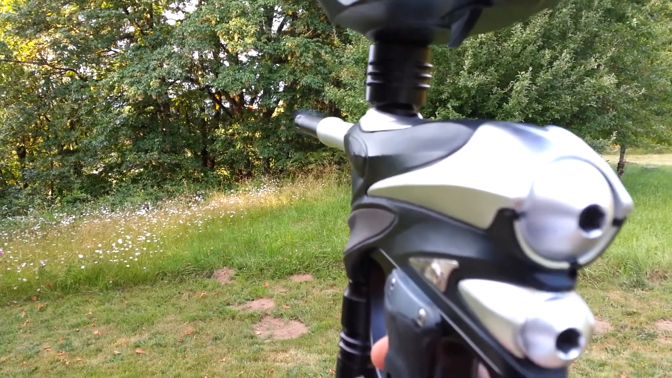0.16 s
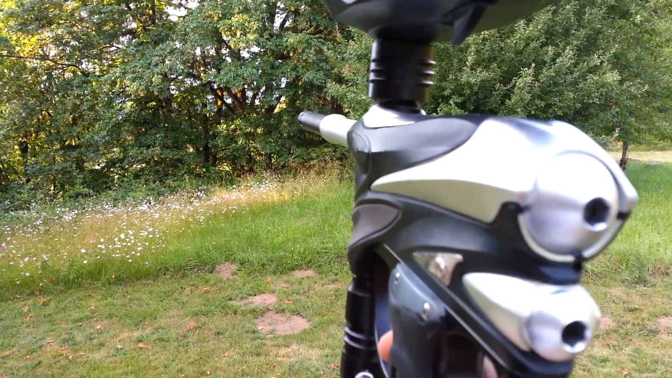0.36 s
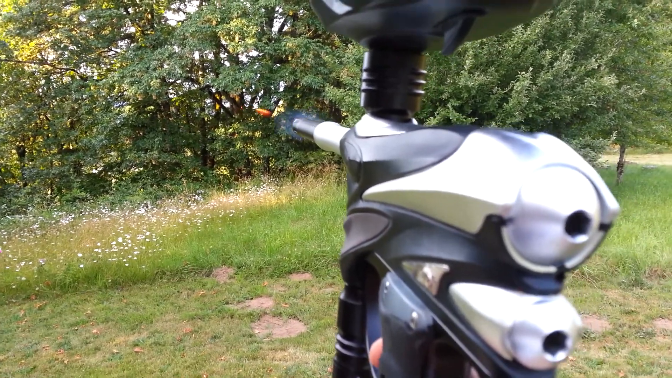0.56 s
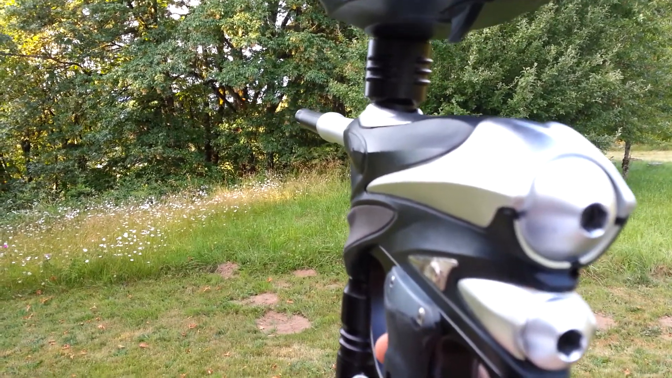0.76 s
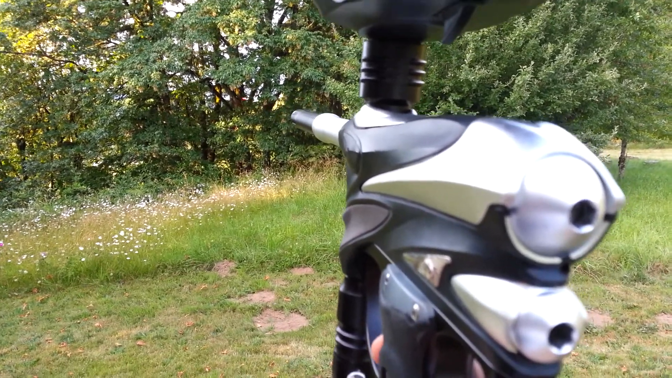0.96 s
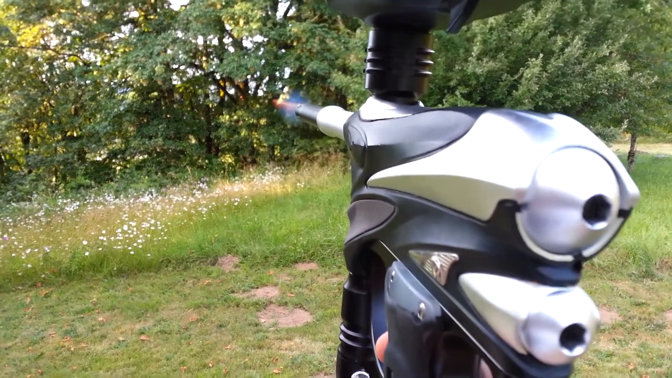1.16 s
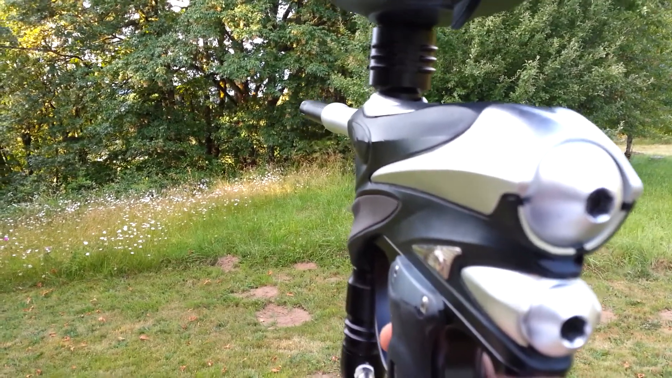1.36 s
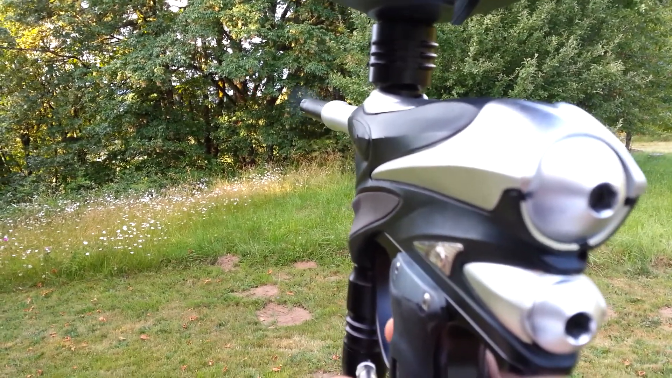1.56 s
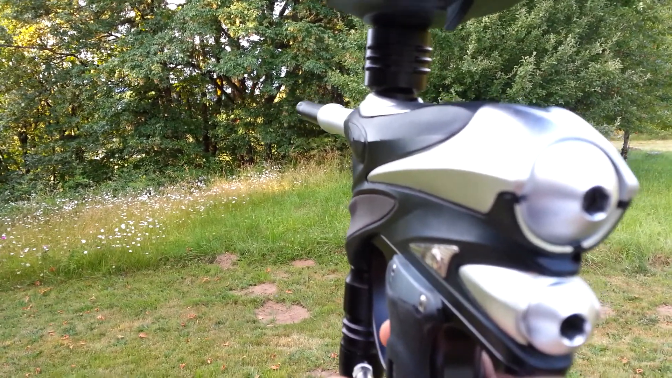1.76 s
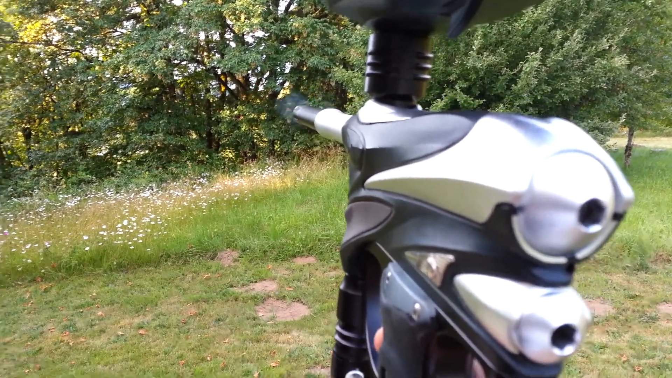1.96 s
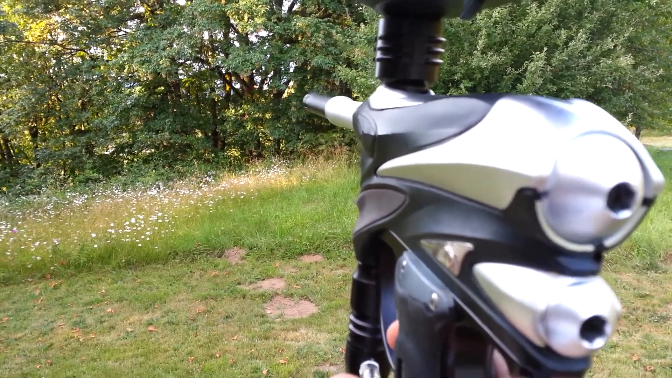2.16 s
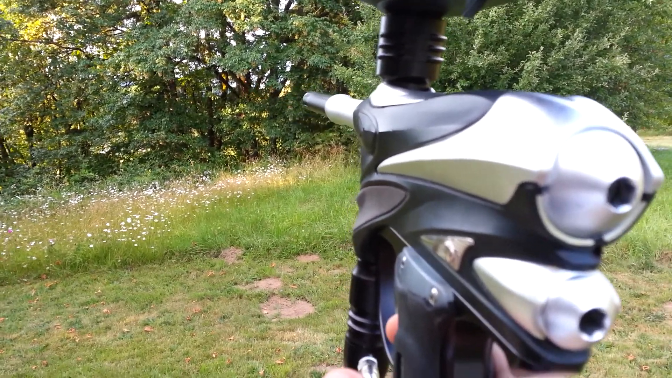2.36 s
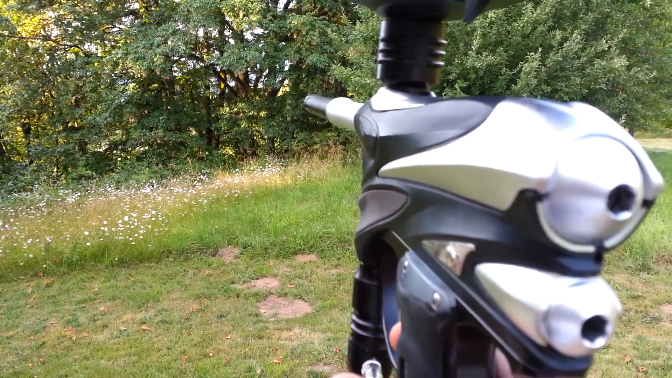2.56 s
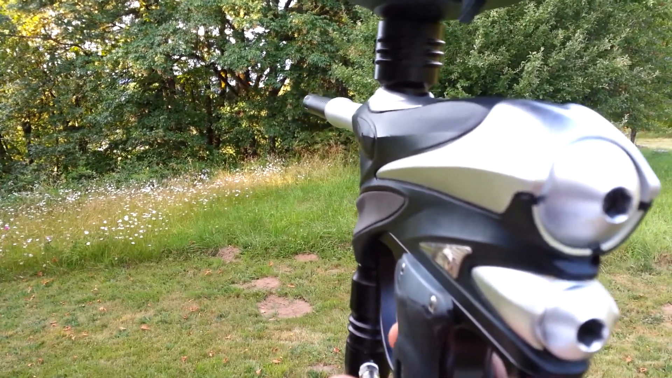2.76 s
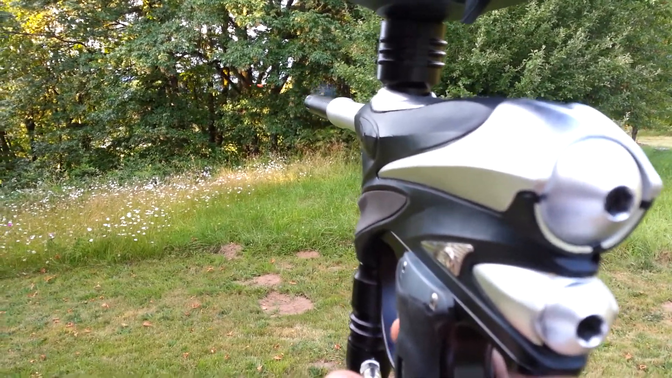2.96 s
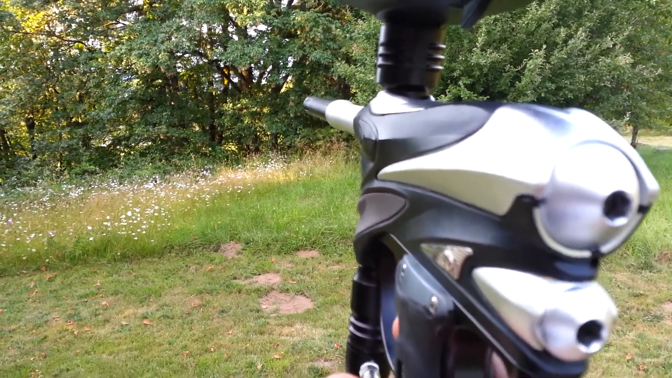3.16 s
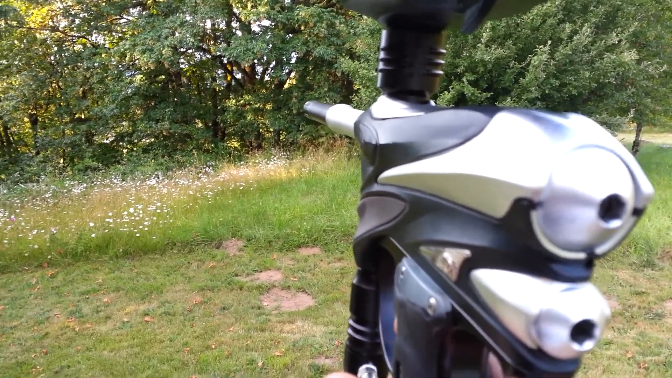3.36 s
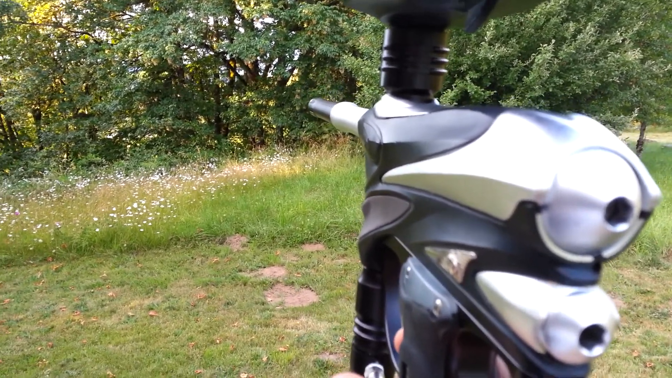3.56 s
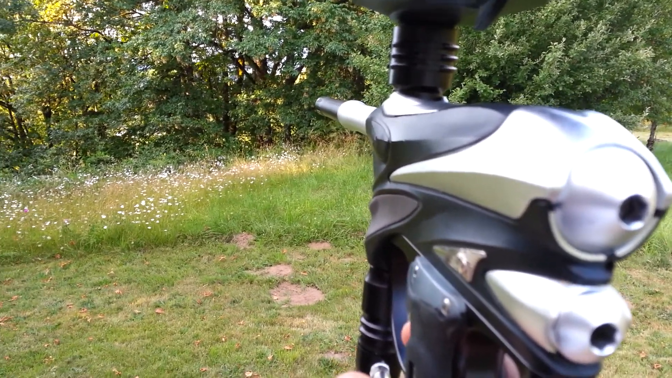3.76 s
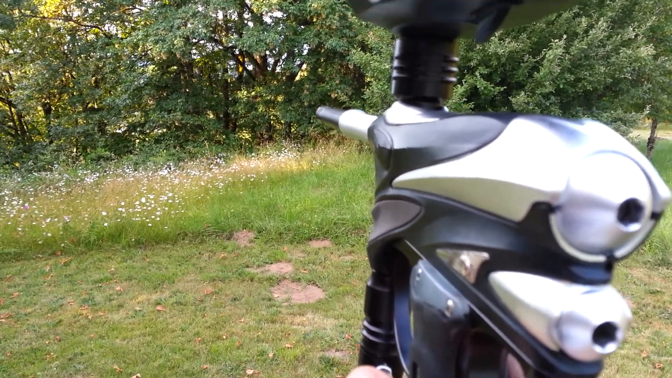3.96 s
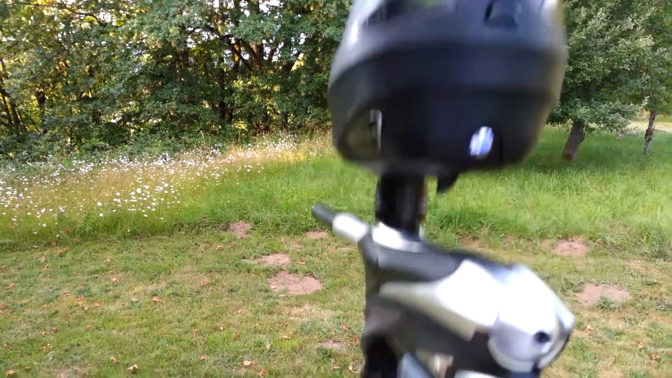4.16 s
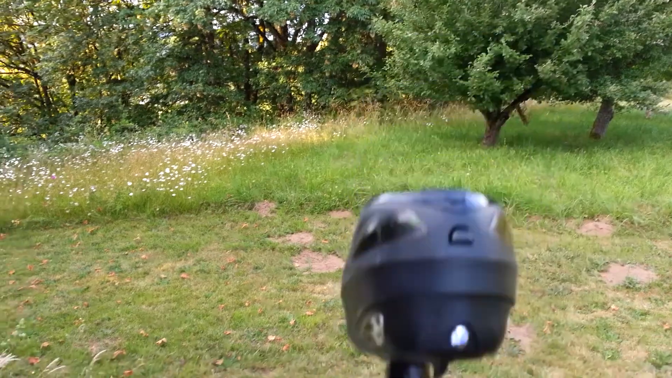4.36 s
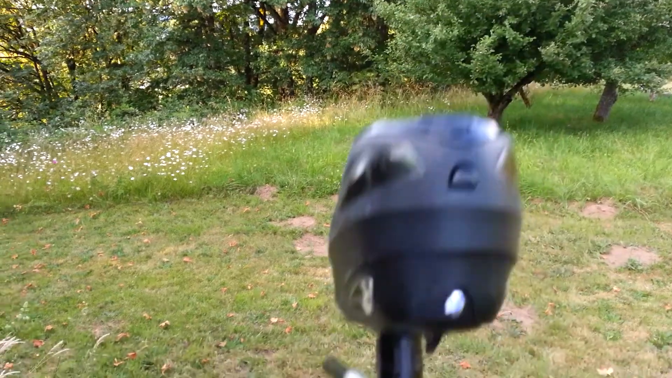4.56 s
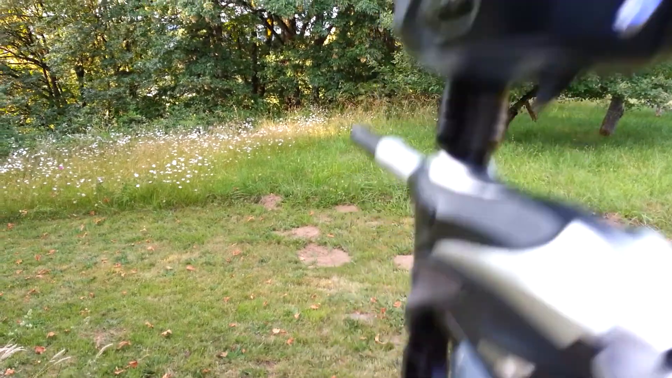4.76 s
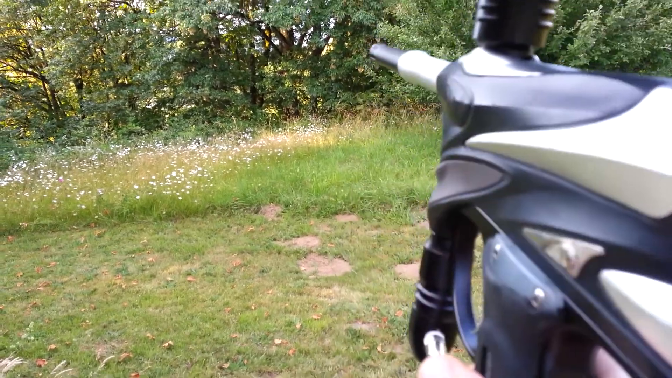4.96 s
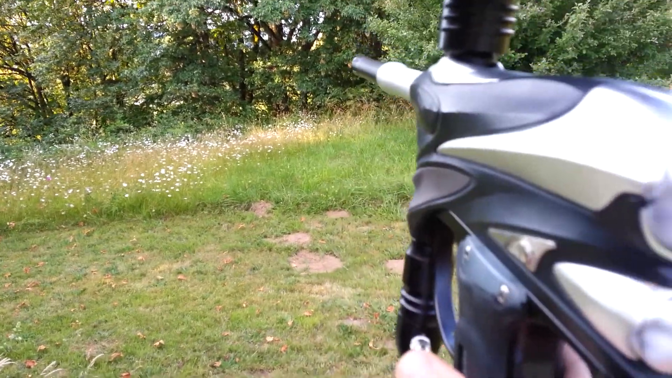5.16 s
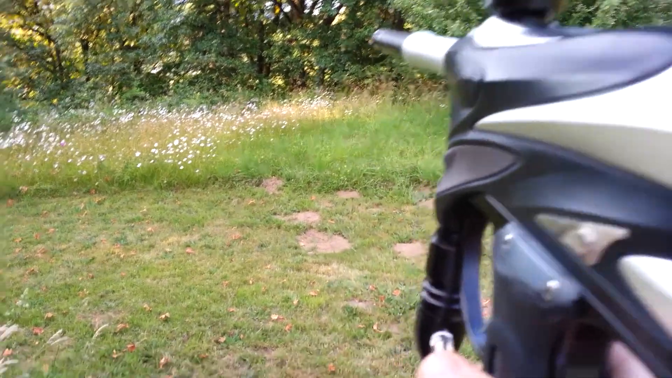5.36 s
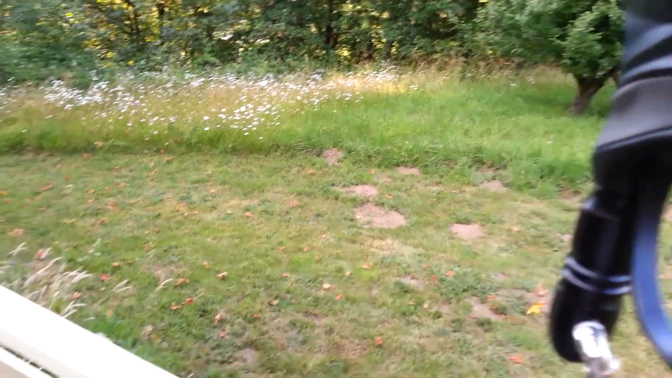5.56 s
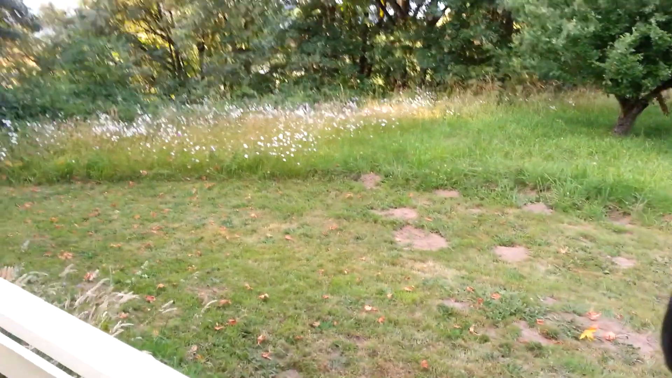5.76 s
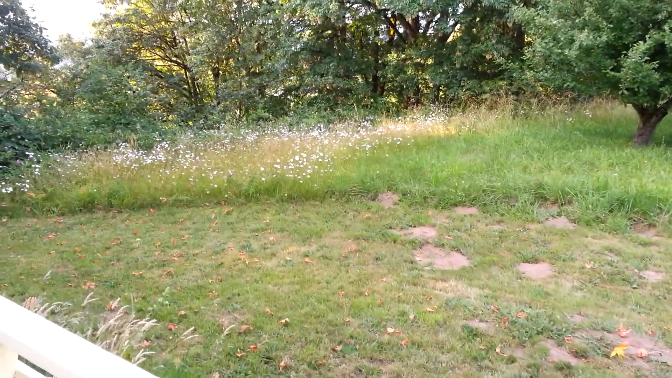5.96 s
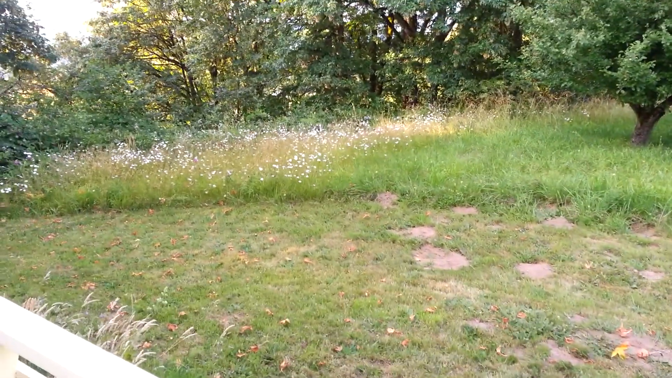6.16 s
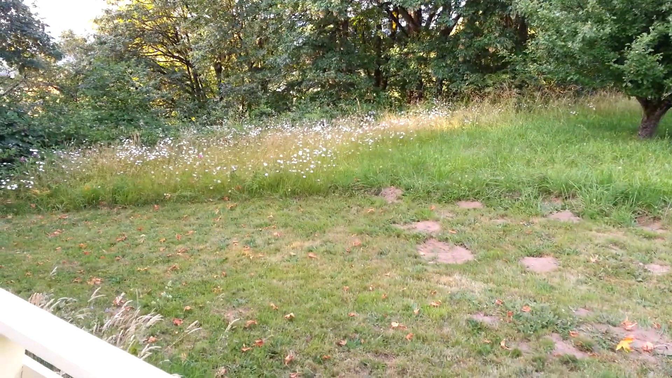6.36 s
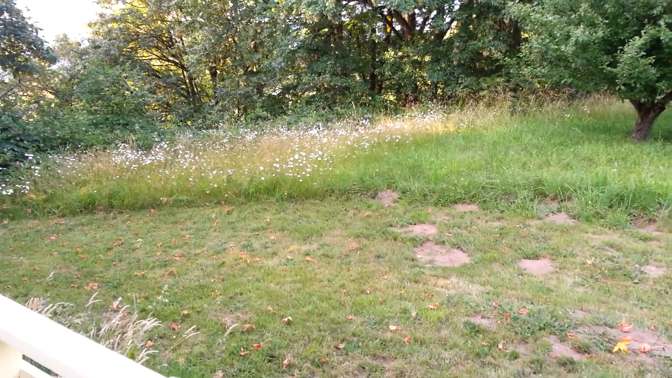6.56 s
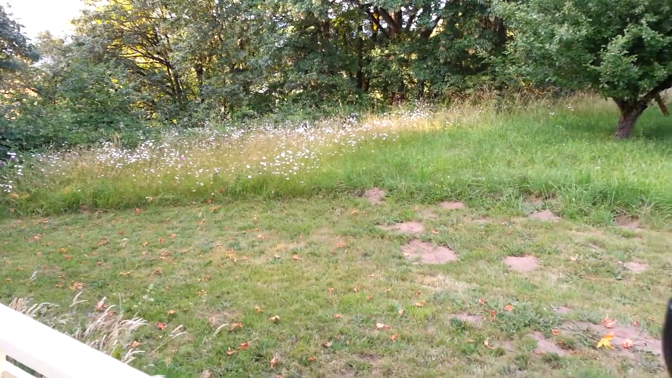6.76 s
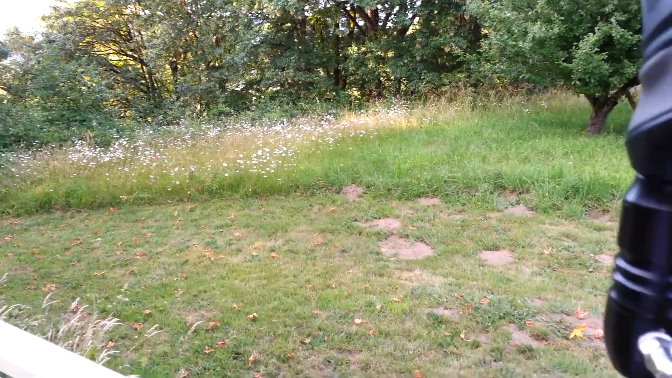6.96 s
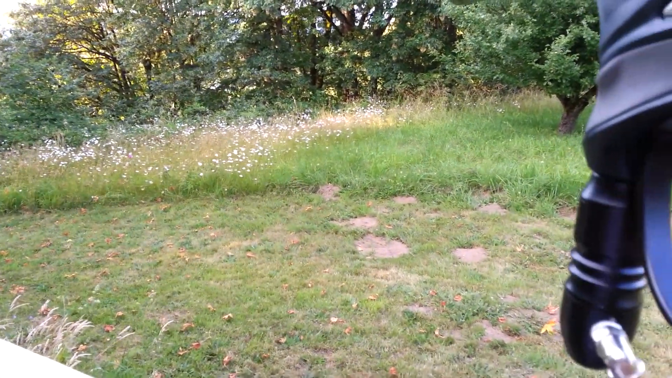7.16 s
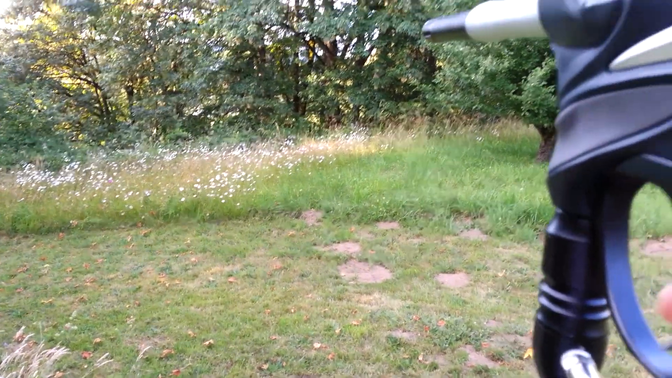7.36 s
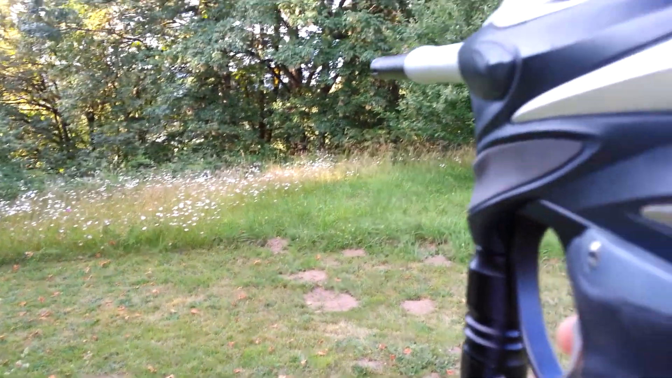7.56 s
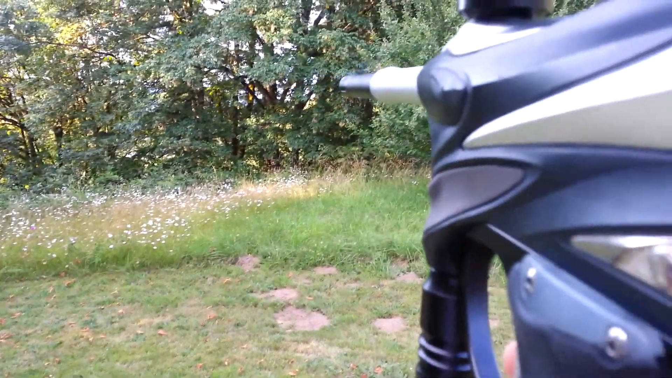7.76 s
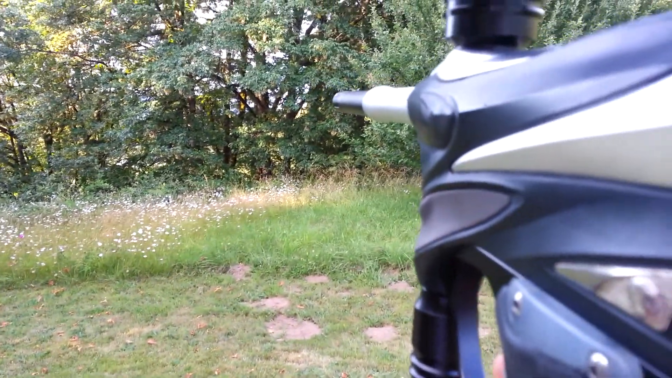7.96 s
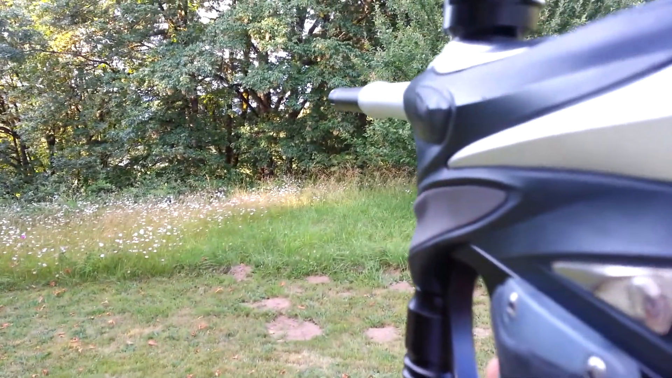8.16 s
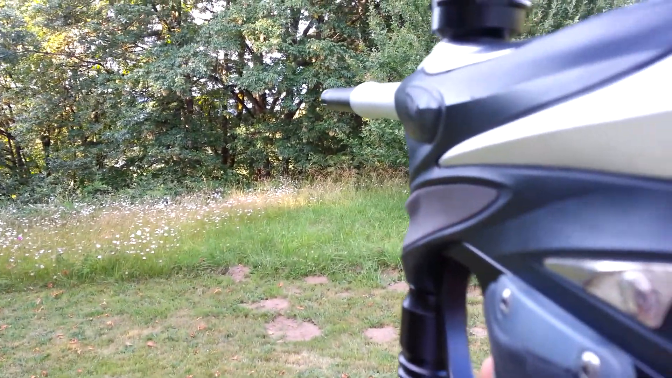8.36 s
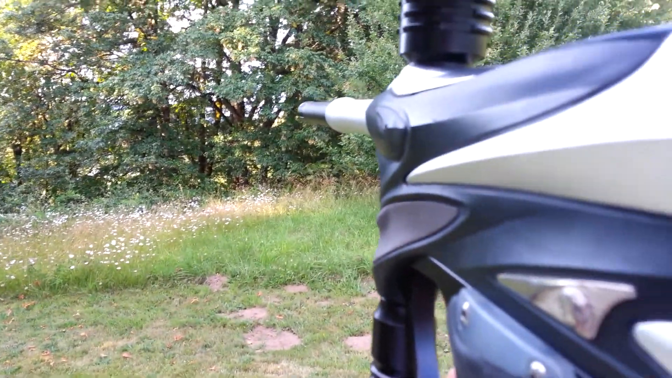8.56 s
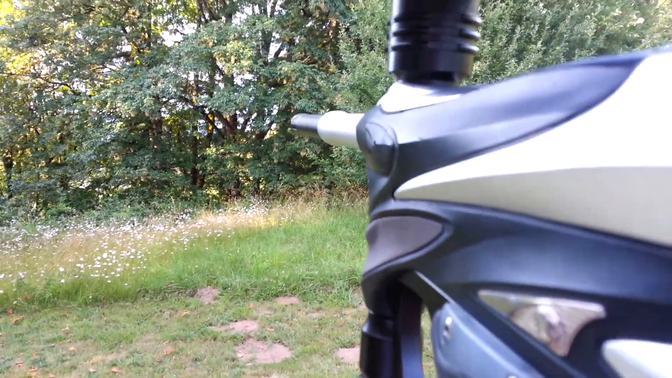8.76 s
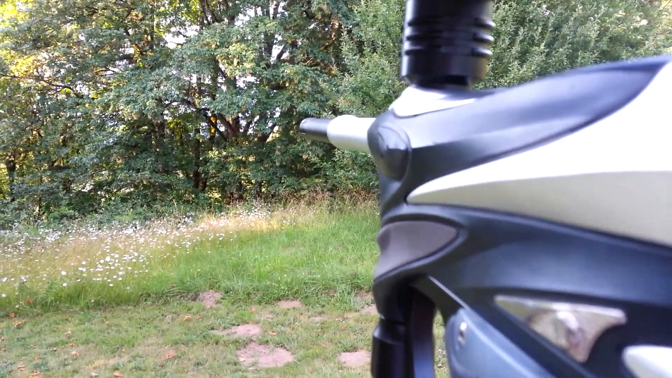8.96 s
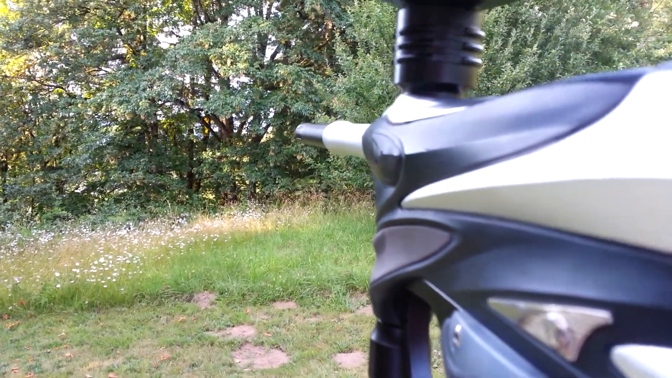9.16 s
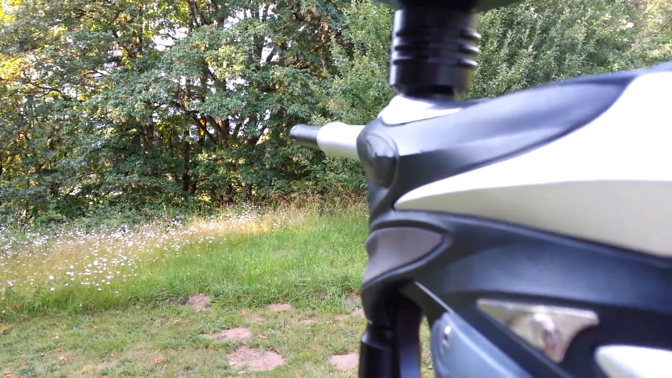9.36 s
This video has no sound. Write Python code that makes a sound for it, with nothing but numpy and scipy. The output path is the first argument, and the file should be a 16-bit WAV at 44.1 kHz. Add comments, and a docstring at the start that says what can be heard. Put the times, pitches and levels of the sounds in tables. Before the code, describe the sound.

Very close and overloaded, a paintball marker fires even streams of about twelve shots a second, then quick single shots, each a hard metallic clack with a gas puff. The hopper motor whines and balls knock in hollow plastic, with a heavy rattle as it tips. The motor stops, leaving faint field air, a far bird and a soft thud; then a lone shot, motor restart and another shot.

```python
"""Fast bursts, quick single shots and later two lone shots of an electropneumatic paintball marker in a field,
a hand's width from a two-port microphone that overloads. Each shot is a solenoid clack, a valve whistle,
ringing blows on the body and puffs of noise for the gas. The loader adds shaft harmonics, gear noise and balls
knocking in a ringing hopper. While its motor rests, falling chirps of a far bird and a soft thud are heard.
Faint coloured noise is the field."""
import sys
import numpy as np
from scipy import signal
from scipy.fft import rfft, irfft, next_fast_len
from scipy.io import wavfile
from scipy.ndimage import uniform_filter1d

SR = 44100
rng = np.random.default_rng(int(sys.argv[2]) if len(sys.argv) > 2 else 0)


def transcribe(u):
    """Save the signal u as a 16-bit wav file named by the first command-line argument.

    u: samples, shape (n,) or (channels, n), limited to [-1, 1]; the rate is SR.
    q: integer samples, one column per channel.
    """
    v = np.clip(np.atleast_2d(u).T, -1, 1)
    q = np.round(v * 32767).astype(np.int16)
    wavfile.write(sys.argv[1], SR, q)


N = 414537

OFF_S, ON_S = 5.46, 6.518  # the loader motor rests between these times
LAG_BACK_MS, LAG_SIDE_MS = 0.037, .22  # how much later a knock reaches the left port


def gain_of(db):
    """dB to a factor."""
    return 10 ** (np.asarray(db) / 20)


def evened(x):
    """Scaled to rms 1."""
    return x / np.sqrt(np.mean(x ** 2) + 1e-20)


def read(points, hz):
    """A spectrum read on a log-frequency axis."""
    f, value = np.transpose(points)
    return np.interp(np.log(hz + 1), np.log(f + 1), value)


def add(mix, s, sound):
    """Mixes a stereo sound in at time s, cutting off what falls outside."""
    at = round(s * SR)
    part = mix[:, max(at, 0):max(at + sound.shape[1], 0)]
    part += sound[:, max(-at, 0):][:, :part.shape[1]]


def waver():
    """Slow random drift of rms 1, a few swings a second."""
    steps = evened(uniform_filter1d(rng.standard_normal(N // 512 + 2), size=8))
    return np.interp(np.arange(N) / 512, np.arange(len(steps)), steps)


def port_noise(size, spectrum, lag_ms, tilt_db=0):
    """Coloured noise of rms 1, partly alike at the two ports, its shared part later on the left."""
    # Likeness of the noise at the two ports. Each row: frequency in Hz, likeness 0-1.
    likeness = [(60, 0.24), (300, 0.93), (900, 0.82), (2000, 0.81), (6000, 0.1), (15000, 0.042)]
    hz = np.fft.rfftfreq(size, 1 / SR)
    right, other = rfft(rng.standard_normal((2, size)))
    same = np.clip(read(likeness, hz), 0, 1)
    delay = np.exp(-2j * np.pi * hz * lag_ms / 1000)
    left = same * right * delay + np.sqrt(1 - same ** 2) * other
    colour = gain_of(read(spectrum, hz) + tilt_db * np.log2(hz / 4000 + 1e-3))
    return evened(irfft(np.array([left, right]) * colour, size))


def ring(modes, t, tilt_db, spread, shade_db):
    """Dying modes from t = 0; each port (row of t) hears each mode at a slightly different strength."""
    hz, db, t60 = np.transpose(modes)[..., None, None]
    detune = rng.standard_normal((len(modes), 1, 1))
    shade = rng.standard_normal((len(modes), 2, 1))
    after = np.maximum(t, 0)
    level_db = db + tilt_db * np.log2(hz / 1000) + shade_db * shade - 60 * after / t60
    tones = np.sin(2 * np.pi * hz * (1 + spread * detune) * after)
    return (gain_of(level_db) * tones).sum(0)


def shot(clack_db, whistle_db, gas_db, return_db):
    """Solenoid clack, valve whistle, bolt and gas blast, then the bolt slamming back."""
    # Ringing of the marker body and its gas chamber.
    # Each row: nominal frequency in Hz, relative level in dB, t60 in seconds.
    body = [(131, -14, 0.11), (292, -8.5, 0.13), (349.2, -3.5, 0.096), (407.4, -1, 0.081),
            (466.2, -2, 0.08), (523.3, -9, 0.11), (730, -10, 0.046), (798, -13, 0.027), (850, -9.5, 0.07),
            (980, -14, 0.022), (1117, -9, 0.051), (1330, -23.5, 0.01), (2011, -11, 0.034),
            (2210, -31.5, .3)]
    # Blows on the body in one firing cycle. Each row: mean time after the solenoid in ms,
    # relative level in dB, brightness in dB per octave, scatter in ms.
    blows = [(11.554, -4, -1.5, 0.12), (14.522, 2, 2, .2), (20.96, -9, -1, 0.55), (28.74, -17.5, 1.5, 0.85),
             (36.12, -10.5, 6.5, 0.26), (40.43, -8, -0.5, .3)]
    # Puffs of gas in one firing cycle. Each row: time after the solenoid in ms,
    # relative level in dB, rise in ms, t60 in ms, brightness in dB per octave.
    puffs = [(.4, -7.5, 1.3, 46, -2), (10.41, 5, 1.3, 30, -2), (14.98, 9, 1, 20.6, 1.7),
             (24.2, -6, 1.6, 76, 0.5), (33.48, 2.5, 2.3, 36.5, -4.5), (43.6, -21.5, 8.9, 334, -1.5)]
    # Colour of the gas before each puff's brightness. Each row: frequency in Hz, relative density in dB per Hz.
    gas = [(290, -36), (500, -7.5), (1130, -6), (1450, -13), (2040, -8.5), (2880, -12.5), (3890, -8.5),
           (5040, -14), (11700, -16.5), (14400, -25), (15400, -23.5)]
    size, lag_ms = 6144, .075
    # the solenoid acts 0.6 ms in, a little later at the left port
    ms = np.arange(size) * 1000 / SR - .6 - np.array([[lag_ms], [0]])

    # the armature bounces at 1.02 kHz for two and a half swings and stops dead
    swings = np.sin(2 * np.pi * 1.02 * ms) * (ms > 0) * (ms < 2.45)
    clack = -gain_of(9.5 + clack_db) * swings * np.exp(-ms / 1.37)

    # air squeezing through the opening valve whistles, falling from 4.446 kHz as the gap widens
    u = ms - np.array([[6.6], [6.2]]) - 0.1175 * rng.standard_normal()
    fall = 0.22 + .03 * rng.standard_normal()
    turns = 4.446 * u - fall * u * abs(u) + rng.random()
    swell = np.clip(u / 0.24, 0, 1) * np.exp(-(u / 3.83) ** 4)
    whistle = gain_of(1.3 + whistle_db) * swell * np.sin(2 * np.pi * turns)

    out = clack + whistle
    for at, db, tilt_db, scatter in blows:
        t = (ms - at - scatter * rng.standard_normal()) / 1000
        level_db = db + return_db * (at > 25)  # the later blows are the bolt's return
        out += gain_of(level_db) * ring(body, t, tilt_db, spread=0.013, shade_db=2.5)
    for at, db, rise, t60, tilt_db in puffs:
        u = np.maximum(ms - at, 0)
        shape = (1 - np.exp(-u / rise)) * gain_of(db + gas_db - 60 * u / t60)
        out += shape * port_noise(size, gas, lag_ms, tilt_db)
    return out


def shaft():
    """Motor inertia: speed in Hz, share of full drive, and seconds of coasting after switch-off."""
    # Free-running shaft speed, sagging under the load of the balls. Each row: time in seconds, speed in Hz.
    speed = [(3.3, 212.4), (4.39, 214.3), (4.5, 209), (4.62, 209.6), (4.9, 215.6), (5.25, 210.8),
             (7.64, 210.3), (7.88, 212.7), (9.4, 211.4)]
    spin_up_s, coast_s = .05, .6  # time constants
    t = np.arange(N) / SR
    coasting = np.where((t > OFF_S) & (t < ON_S), t - OFF_S, 0)
    spin_up = np.where(t < ON_S, 1, 1 - np.exp(-np.maximum(t - ON_S, 0) / spin_up_s))
    hz = np.interp(t, *np.transpose(speed)) * spin_up * np.exp(-coasting / coast_s)
    return hz, spin_up, coasting


def motor_whine(angle, turned, coasting):
    """Harmonics of the turning shaft, each wavering in level and balanced by the side that is heard."""
    # Shaft orders before the common 1.5 dB lift. Each row: multiple of the shaft speed,
    # rms level in dB heard from the back, rms level in dB heard from the side.
    orders = [(1, -65, -59), (2, -50, -49), (3, -39, -52), (4, -48, -50), (5, -51, -49), (6, -53, -50),
              (7, -49, -60), (8, -48, -58), (9, -50, -49), (10, -54, -56), (11, -53, -49), (12, -62, -54),
              (13, -59, -62), (15, -51, -61), (16, -60, -58), (18, -60, -62), (19, -59, -62),
              (20, -63, -57), (21, -60, -60), (22, -61, -60)]
    lift_db, fade_db_per_s, start_s = 1.5, 210, 3.2
    surge_peak_db, surge_s = 16, .12
    t = np.arange(N) / SR
    # the three-slot armature hums hard while it pulls up to speed
    surge_db = surge_peak_db * (t > ON_S) * np.exp(-(abs(t - ON_S) / surge_s) ** 2)
    whine = np.zeros((2, N))
    for k, back_db, side_db in orders:
        level_db = surge_db * (k == 3) + back_db + turned * (side_db - back_db) + 2.55 * waver()
        whine += gain_of(level_db) * np.sin(k * angle + 2 * np.pi * rng.random())
    whine *= np.sqrt(2) * gain_of(lift_db - fade_db_per_s * coasting)
    # no steady whine earlier, while shots keep stalling the feed
    return whine * np.clip((t - start_s) / .03 + .5, 0, 1)


def gear_noise(angle, turned):
    """Meshing gears as coloured noise, crossfaded from back to side and chopped by the brushes."""
    # Gear noise heard from the back and from the side. Each row: frequency in Hz, relative density in dB per Hz.
    back_colour, side_colour = [(90, -42), (150, -36), (210, -32.5), (315, -21), (390, -6.5), (600, -23),
                                (950, -12), (1480, -1), (2600, -16), (3500, -19), (4700, -10), (6500, -24),
                                (8500, -20), (13200, -30), (15400, -53)], [(90, -26), (150, -24), (210, -19), (315, -19), (385, 2),
                                                    (735, -8.5), (1790, 2), (2260, 0.5), (2800, -10),
                                                    (4200, -11.5), (6200, -16), (8630, -17), (11800, -27),
                                                    (13500, -31), (15400, -54.5)]
    size = next_fast_len(N)
    gears = np.sqrt(1 - turned) * port_noise(size, back_colour, 0.33)[:, :N]
    gears += np.sqrt(turned) * port_noise(size, side_colour, 0.29)[:, :N]
    return gears * (1 + 0.18 * np.sin(angle))  # the brushes chop the noise once a turn


def knock(tilt_db, boom_db, clatter_ms, lag_ms):
    """Balls jostle against the plastic shell: a short flurry of contacts, each ringing it briefly."""
    # Hopper shell. Each row: nominal frequency in Hz, relative level in dB before boom and brightness,
    # t60 in seconds.
    modes = [(411, -8, 0.071), (530, -6, .03), (850, -13, 0.011), (1180, -2, 0.02), (1330, -2.5, 0.008),
             (1590, 1, 0.023), (2190, 0.5, .014), (2700, -1, .01), (3140, -2, 0.013), (3730, -6, 0.0052),
             (4200, -6, 0.0089), (5000, -13, 0.0045), (5900, -13.5, 0.0023), (7400, -19, 0.0039),
             (8870, -22.5, .003)]
    t = np.arange(3072) / SR - np.array([[1 + lag_ms], [1]]) / 1000
    shell = [(hz, db + boom_db * (hz < 600), t60) for hz, db, t60 in modes]
    ms = np.arange(1024) * 1000 / SR
    contacts = rng.standard_normal(1024) * (rng.random(1024) < .3) * np.exp(-ms / max(clatter_ms, .3))
    contacts[0] = 3
    rings = ring(shell, t, tilt_db, spread=.06, shade_db=3.5)
    rings[:, 48:51] += gain_of(-7.5)  # the dry tick of the contact itself
    tap = signal.fftconvolve(rings, contacts[None], axes=1)
    bass_cut = signal.butter(4, 330, "high", fs=SR, output="sos")  # a small shell sends out no bass
    tap = signal.sosfilt(bass_cut, tap)
    return tap / abs(tap).max()


def rattle(level_db):
    """Loose balls tumbling over the feed paddle: many small knocks of uneven strength."""
    out = np.zeros((2, N))
    for tilt in np.linspace(-4, 6, 12):
        struck = rng.random(N) < 12 / SR  # about 12 a second of each brightness
        strength = gain_of(3.9 * np.minimum(rng.exponential(1, N), 4)) * struck
        hits = strength[None] * gain_of(level_db)
        out += signal.oaconvolve(knock(tilt, -5.0, 2.0, LAG_SIDE_MS), hits, axes=1)[:, :N]
    return out


def hopper_knocks(turned):
    """Single ball knocks, their boom, flurry length and port lag set by how the hopper is turned."""
    # Balls knocking in the hopper. Each row: start in seconds, peak level in dB before panning,
    # brightness in dB per octave.
    knocks = [(1.781, -7.5, 6), (1.821, -14, 4), (1.844, -17, -1), (1.852, -8.5, 7), (2.245, -2, 3),
              (2.507, -7.5, 9), (2.812, -17, 10), (2.913, -17, 12), (3.215, -13, 6), (3.295, -11, 7),
              (3.434, -8, 8), (3.553, -18, 7), (4.358, -18, -14), (4.398, -15, 1), (4.423, -8, 14),
              (4.431, -7, 14), (4.459, 1.5, -9), (4.477, -1, -8), (4.489, -6, -20), (4.508, -1, -26),
              (4.531, -7, -8), (4.564, -8.5, 3), (4.584, -9, 7.5), (4.753, -15.5, 6), (4.958, -15.5, 0),
              (5.035, -14, -8), (5.09, -11.5, 2), (5.139, -7.5, 12), (5.178, -14.5, -6), (5.194, -12, -1),
              (5.219, -10, 10), (5.299, -10.5, -3.5), (5.341, -5.5, 11), (5.392, -8, 9), (5.45, -5, 5.5),
              (6.539, 1, 9), (6.762, -16, 14), (6.888, -14, 8), (6.973, -10.5, 2.5), (7.172, -12, 10),
              (7.362, -16.5, 8), (7.481, -11, 6), (7.64, -11.5, 4), (7.875, -10, 1), (8.08, -10.5, 0.5),
              (8.215, -9, 2), (8.318, -11.5, 3), (8.469, -7, 5.5), (8.574, -12, 4), (8.728, -17, -2),
              (8.796, -13.5, 3), (8.971, -8, 9), (9.091, -17, 1), (9.203, -5, 2), (9.307, -11, 6)]
    # boom of the shell in dB, length of the flurry in ms, lag of the left port in ms
    back = np.array([-12.5, 3, LAG_BACK_MS])
    side = np.array([-3, 8.8, LAG_SIDE_MS])
    out = np.zeros((2, N))
    for s, db, tilt_db in knocks:
        boom_db, clatter_ms, lag_ms = back + turned[round(s * SR)] * (side - back)
        boom_db += 1.3 * tilt_db  # the boom stays while the contact brightens
        add(out, s, gain_of(db) * knock(tilt_db, boom_db, clatter_ms, lag_ms))
    return out


def loader():
    """Shaft orders, gear noise, rattle and knocks, coloured by how the hopper is turned."""
    # How the loader is held. Each row: time in seconds, gear noise in dB while driven,
    # turn 0-1 from its back to its side, left-right difference in dB.
    pose = [(1.85, -30, .3, 1), (3.2, -29.5, 0.2, .5), (3.7, -33.5, 0.11, -0.5), (4.33, -36, 0.46, 0),
            (4.42, -26.5, 0.57, 3), (4.5, -26.5, 0.27, 2), (4.65, -30.5, 0.78, 2.5), (4.9, -33, 0.7, -2.5),
            (5.05, -29.5, 0.93, -2), (5.25, -30.5, 0.35, -2), (5.36, -23, 0.78, 0), (5.46, -27, 0.92, -2.5),
            (6.6, -28, 0.85, -6), (6.9, -28, 1, -3.5), (7.55, -27, 0.95, -3.5), (7.8, -29.5, 0.72, -1.5),
            (9.4, -30, 0.8, -1.5)]
    gears_fade_db_per_s = 145  # while coasting
    rattle_back_db, rattle_side_db = -10.5, -2  # rattle against gear noise
    t = np.arange(N) / SR
    s, *columns = np.transpose(pose)
    gears_db, turned, pan_db = (np.interp(t, s, c) for c in columns)
    turned = np.clip(turned, 0, 1)
    hz, drive, coasting = shaft()
    hz = hz * (1 + .0006 * waver())
    angle = 2 * np.pi * np.cumsum(hz) / SR - np.array([[.08], [0]])

    gears_db = gears_db - gears_fade_db_per_s * coasting
    # tipping the marker at 4.43 s throws the balls about
    shake_db = 17.5 * np.exp(-((t - 4.43) / 0.07) ** 2)
    rattle_db = gears_db + rattle_back_db + turned * (rattle_side_db - rattle_back_db) + shake_db

    running = motor_whine(angle, turned, coasting)
    running += gain_of(gears_db) * gear_noise(angle, turned)
    running += rattle(rattle_db)
    out = drive * running + hopper_knocks(turned)
    return out * gain_of(pan_db * np.array([[.5], [-.5]]))


def chirp(db, start_hz, end_hz, length):
    """A bird's falling whistle with a shorter, softer one right after it that starts lower."""
    out = np.zeros((2, 4096))
    for delay, drop_db, share in [(0, 0, 1), (length + .003, -3, .6)]:
        hz = np.linspace(end_hz + share * (start_hz - end_hz), end_hz, int(share * length * SR))
        note = np.hanning(len(hz)) * np.sin(2 * np.pi * np.cumsum(hz) / SR)
        # a touch later and louder on the right
        add(out, delay, gain_of(db + drop_db) * np.array([note, 1.2 * np.roll(note, 3)]))
    return out


def thud(db, hz):
    """Three soft low beats: a sine swelling three times under one arch."""
    t = np.arange(1600) / SR
    arch = np.sin(np.pi * t / t[-1]) * np.sin(np.pi * 3 * t / t[-1]) ** 2
    beats = arch * np.sin(2 * np.pi * hz * t)
    return gain_of(db) * np.array([beats, beats])


def field_air():
    """The open field as steady, faint coloured noise."""
    # Field colour. Each row: frequency in Hz, relative density in dB per Hz.
    colour = [(24, -47), (40, -7.5), (111, 7.5), (235, -7), (301, -2), (1130, -10.5), (2050, -15.5),
              (6290, -23), (13600, -24), (15400, -41.5)]
    return gain_of(-55.5) * port_noise(next_fast_len(N), colour, 0.3)[:, :N]


def scene():
    """Marker, hopper and field together."""
    # Trigger pulls. Each row: first shot in seconds, shots in a row, strength in dB.
    bursts = [(-.019, 2, -2), (.182, 9, -2), (.9576, 10, -2), (1.927, 6, -2), (2.4235, 1, -2),
              (2.5495, 1, -1), (2.644, 1, -2), (2.747, 1, -1), (2.846, 1, -1), (2.974, 1, -1),
              (3.085, 1, -2), (6.455, 1, -6), (7.69, 1, -2)]
    cycle_s = .0813  # from shot to shot in a row
    # Mean level and shot-to-shot scatter of a shot's parts.
    # Each lists: solenoid in dB, valve whistle in dB, gas in dB, bolt return in dB.
    mean_db, scatter_db = np.array((0.9, 0.15, 3, -3.5)), np.array((2.1, 1.8, 2.1, 4.1))
    # Falling double chirps. Each row: start in seconds, level in dB, start pitch in Hz, end pitch in Hz,
    # length of the first whistle in seconds.
    calls = [(5.6, -50, 5820, 3500, 0.032), (5.912, -60, 6030, 4040, .022), (6.07, -59, 6000, 3700, 0.028),
             (6.317, -56, 6000, 3850, .03)]
    # A soft low bump. The row: start in seconds, level in dB, pitch in Hz.
    bump = (6.252, -44, 190)
    mix = loader() + field_air()
    for first, shots, db in bursts:
        for k in range(shots):
            parts_db = mean_db + scatter_db * rng.standard_normal(len(mean_db))
            add(mix, first + k * cycle_s, gain_of(db) * shot(*parts_db))
    for s, *call in calls:
        add(mix, s, chirp(*call))
    add(mix, bump[0], thud(*bump[1:]))
    return mix


def record(dry):
    """Port colour and bass roll-off, overload at full scale, then the band limit."""
    # Each port colours the sound in its own way. Each row: frequency in Hz, left-right difference in dB.
    port_colour = [(60, -8.5), (110, 0.0), (200, 3), (380, 1), (700, -4), (1290, 9.5), (2380, 0),
                   (4390, -2.5), (8110, -4.5), (15000, -1.5)]
    hz = np.linspace(0, SR / 2, 129)
    difference_db = read(port_colour, hz)
    ports = [signal.firwin2(129, hz, gain_of(side * difference_db / 2), fs=SR) for side in (1, -1)]
    coloured = signal.oaconvolve(dry, np.array(ports), "same", axes=1)
    thin = signal.sosfilt(signal.butter(2, 170, "high", fs=SR, output="sos"), coloured)
    clipped = thin / (1 + abs(thin) ** 8) ** (1 / 8)  # nearly straight, then a tight bend at full scale
    band_limit = signal.firwin(255, 15500, window=("kaiser", 7), fs=SR)
    limited = signal.oaconvolve(clipped, band_limit[None], "same")
    return np.clip(limited, -1, 1)


dry = scene()
out = record(dry)
transcribe(out)
```